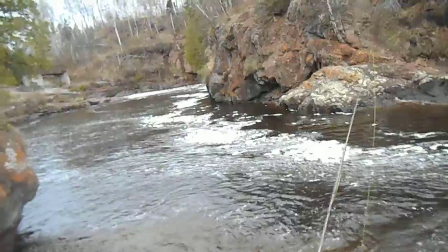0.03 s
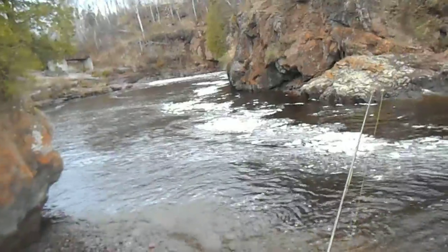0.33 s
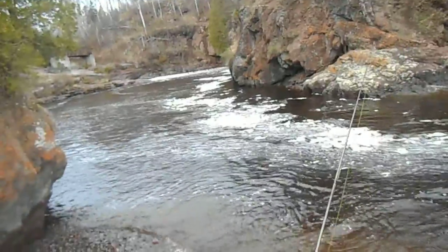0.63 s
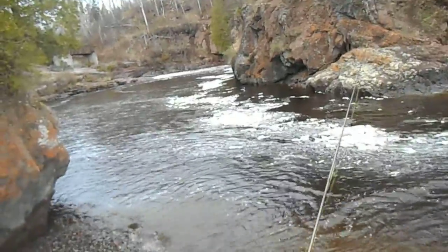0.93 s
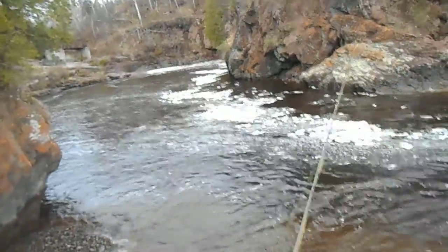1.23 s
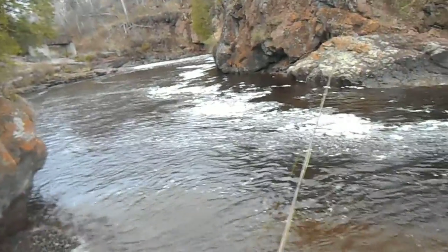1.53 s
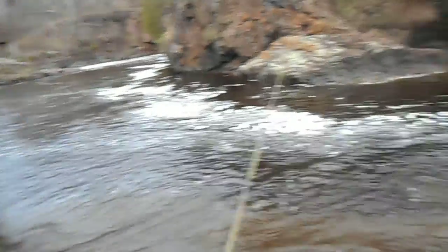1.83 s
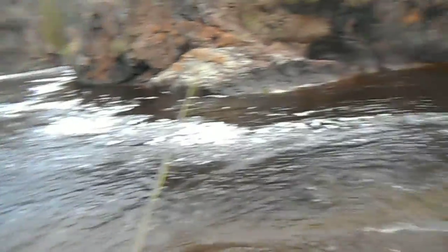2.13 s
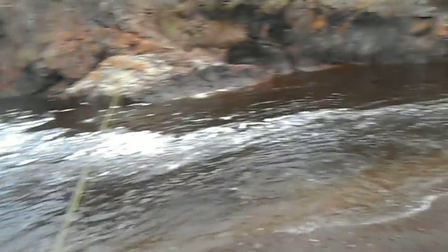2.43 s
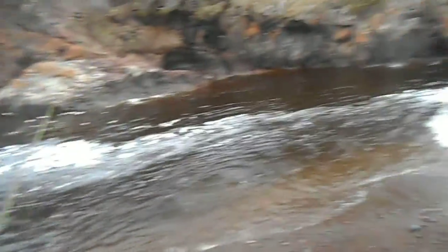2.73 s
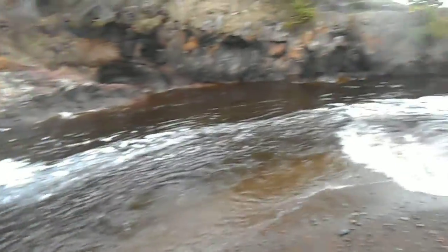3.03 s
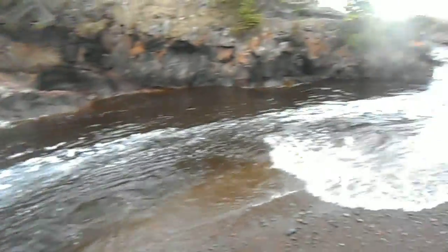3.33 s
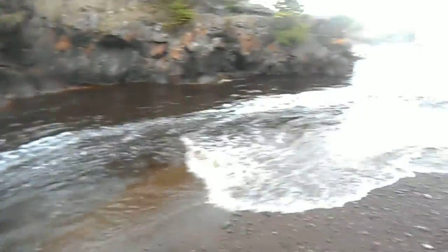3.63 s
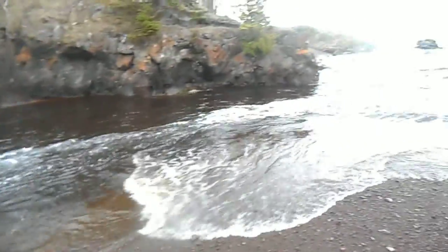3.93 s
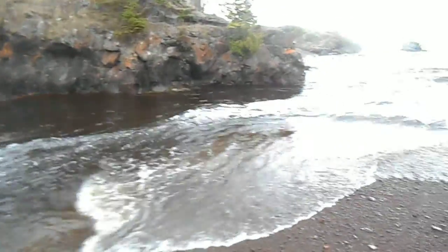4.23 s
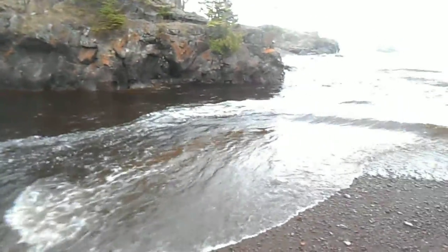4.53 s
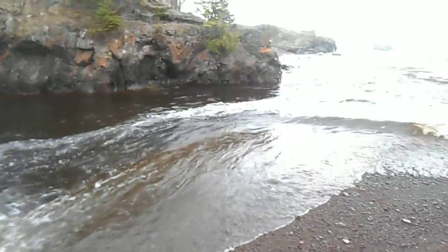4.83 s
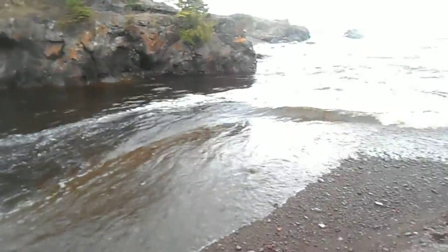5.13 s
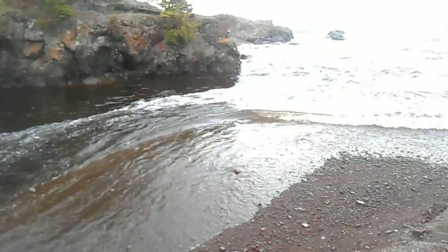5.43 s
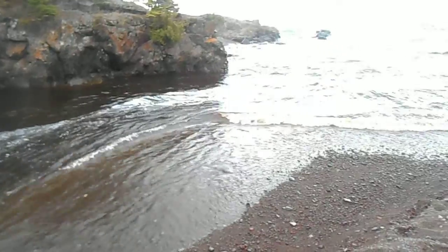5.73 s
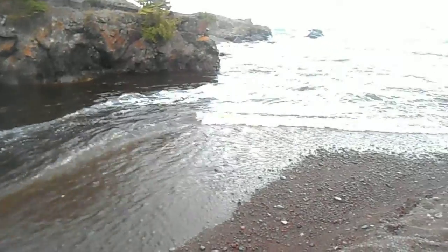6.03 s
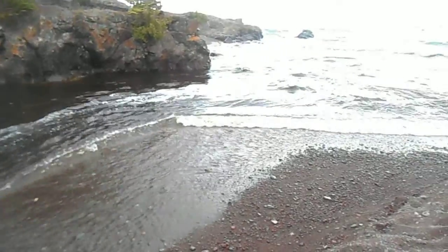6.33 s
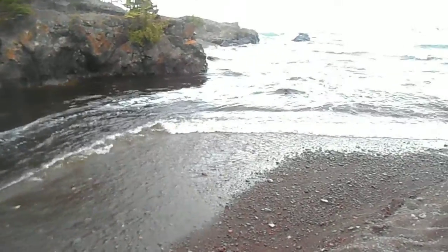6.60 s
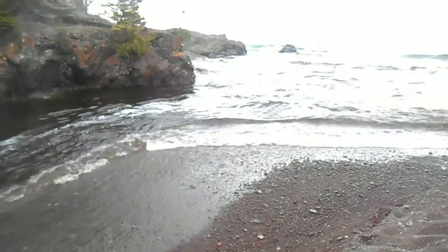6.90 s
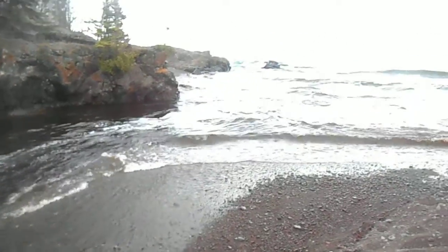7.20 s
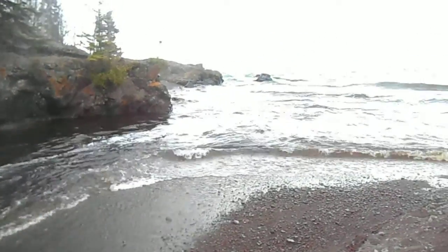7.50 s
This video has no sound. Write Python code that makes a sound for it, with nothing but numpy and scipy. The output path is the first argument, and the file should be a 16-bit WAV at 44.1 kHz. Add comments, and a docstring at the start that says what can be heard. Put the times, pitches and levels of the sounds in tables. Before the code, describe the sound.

Continuous rush of river water meeting a lake, with small waves swelling and fizzing over pebbles and a few faint drips.

```python
"""A short burst of water noise with a low thump of wind comes first; then a river fades in, running
over a pebble beach into a lake where small waves break. Clouds of bubbles make the sound, and the
smaller the bubble, the higher it rings: the current gurgles, rapids and breakers churn, the swash
hisses, its foam fizzes. Near drops plop and patter, and light gusts buffet the microphone."""
import sys
import numpy as np
from scipy import signal
from scipy.fft import rfft, irfft, next_fast_len
from scipy.io import wavfile
from scipy.ndimage import uniform_filter1d

SR = 44100
rng = np.random.default_rng(int(sys.argv[2]) if len(sys.argv) > 2 else 0)


def waveform_to_disk(signal):
    """Save audio, clipped to [-1, 1], as 16-bit WAV at the path in sys.argv[1]."""
    frames = np.transpose(np.atleast_2d(signal))
    scaled = np.clip(frames, -1, 1) * 32767
    samples = np.round(scaled).astype(np.int16)
    wavfile.write(sys.argv[1], SR, samples)


N = 337806
TIME = np.arange(N) / SR

# spectra of the four bubble clouds and of a droplet's splat: frequency_hz, relative_density_db
CURRENT_SPECTRUM = [(30, -6.5), (90, -7), (170, -3), (250, -1), (340, -0.3), (480, -2), (600, -2.5),
                    (750, -5.5), (1300, -26), (3000, -38)]
FOAM_SPECTRUM = [(1500, -21), (3000, -8.5), (5200, 0.5), (6500, 0), (8000, -3.5), (10200, -8), (11000, -24),
                 (11700, -25.5), (12400, -40)]
CHURN_SPECTRUM = [(250, -25), (500, -9), (720, -1.5), (900, -0.5), (1100, 0), (1450, -0.6), (1750, 0),
                  (2100, -1), (2700, -3.5), (3800, -10.5), (5500, -18), (10000, -35)]
SWASH_SPECTRUM = [(800, -17), (1700, -6), (2600, -1), (3500, 0.5), (5000, -3), (6500, -10), (10000, -22.5),
                  (11000, -42)]
SPLAT_SPECTRUM = [(2000, -12), (4000, 0), (7000, 3), (10200, -6.5), (11000, -20), (12400, -32)]
# the current apart from its surges: time_s, level_db
CURRENT_LEVELS = [(.5, -40), (1.0, -39.5), (1.8, -34), (2.4, -35.5), (5.8, -36.5), (6.8, -39.5)]
# wind eddies at the microphone: centre_s, half_length_s, relative_level_db, upper_edge_hz
EDDIES = [(0.045, 0.047, -28.5, 200), (1.418, 0.048, -39, 90), (2.67, 0.11, -37.5, 110),
          (6.962, .05, -39, 59.6), (7.22, 0.053, -34.5, 120), (7.28, .016, -26, 360),
          (7.294, .022, -23, 170), (7.364, .06, -38, 120), (7.45, 0.033, -30, 100), (7.61, 0.14, -37, 120)]
# small splashes at the near bank: centre_s, half_length_s, peak_db
BANK_SPLASHES = [(.675, 0.028, -33), (0.849, .004, -28), (1.263, 0.0036, -30), (1.41, .012, -33),
                 (1.441, .005, -28), (1.78, 0.034, -34), (2.703, .17, -38), (2.741, 0.0033, -22.5),
                 (2.772, 0.032, -30), (2.846, .008, -31)]
# near drops: start_s, pitch_hz, strength_db, t60_s
NEAR_DROPS = [(.2875, 1500, -22, .008), (.4096, 2000, -9, .012), (.430, 6300, -20, .008),
              (.668, 7800, -25, .015), (1.262, 7200, -20, .005), (1.606, 1100, -19, .014),
              (2.741, 6000, -16, .006), (2.767, 6500, -20, .012), (4.300, 2400, -10, .006)]
# steady rush, one row each for churn, swash and foam: facing_rapids_db, facing_lake_db
STEADY_LEVELS = [(-31.5, -30), (-34.5, -28.5), (-40, -32)]
# surges in the rapids: start_s, level_db
RAPIDS_SURGES = [(.39, -29.5), (1.0, -28.5), (1.5, -35)]
# gain of each cloud in a surge: churn_db, swash_db, foam_db
SURGE_GAINS = [0.5, -4.5, -7]
# waves reaching the beach: start_s, hold_s, churn_db, swash_db, foam_db
BEACH_WAVES = [(3.09, .05, -28.5, -24.8, -33.5), (4.21, 0.44, -27.5, -26, -27.5),
               (5.25, .25, -35.5, -29, -32.5), (7.3, .3, -26.5, -22.5, -24)]
# envelope of a wave, one row each for churn, swash and foam: rise_s, fall_db_per_s
WAVE_ENVELOPES = [(0.68, 4), (0.45, 3.5), (0.58, 4.5)]


def undb(db):
    """Amplitude grows tenfold for every 20 decibels."""
    return 10 ** (np.asarray(db) / 20)


def unit(x):
    """Normalisation brings the rms to 1."""
    return x / np.sqrt(np.mean(x ** 2))


def add(out, start_s, sound):
    """Superposition: a short sound adds its pressure to what is already there."""
    start = int(np.clip(start_s * SR, 0, N - 1))
    out[start:start + len(sound)] += sound[:N - start]


def ramp(start_s, length_s):
    """A linear rise from 0 saturates at 1."""
    return np.clip((TIME - start_s) / length_s, 0, 1)


def colour(x, spectrum):
    """Filtering weights each frequency by a spectrum and rolls off beyond its ends; rms 1."""
    hz, db = np.transpose(spectrum)
    size = next_fast_len(N)
    log_f = np.log(np.maximum(np.arange(size // 2 + 1) * SR / size, 1))
    outside = np.abs(log_f - np.clip(log_f, np.log(hz[0]), np.log(hz[-1])))
    gain = undb(np.interp(log_f, np.log(hz), db) - 20 * outside)
    return unit(irfft(rfft(x, size) * gain, size)[:N])


def flicker(rate_hz):
    """Random modulation glides from one chance value to the next; rms 1."""
    hold = max(int(SR / rate_hz), 2)
    held = np.repeat(rng.standard_normal(N // hold + 2), hold)
    return unit(uniform_filter1d(held[rng.integers(hold):][:N], hold))


def wash(flicker_db, flicker_hz, bands=8):
    """Countless far bubbles sum incoherently to noise, each size class flickering in its own band."""
    edges_hz = np.geomspace(100, 13000, bands + 1)
    size = next_fast_len(N)
    noise = rfft(rng.standard_normal(size))
    band = np.searchsorted(edges_hz[1:-1], np.arange(len(noise)) * SR / size)
    classes = (irfft(noise * (band == k), size)[:N] for k in range(bands))
    return unit(sum(rush * undb(flicker_db * flicker(flicker_hz)) for rush in classes))


def bubble(hz, t60_s, pitch_rise):
    """A bubble is a damped oscillator whose resonance rises as it nears the surface."""
    t = np.arange(int(t60_s * SR) + 2) / SR
    phase = 2 * np.pi * hz * t * (1 + pitch_rise * t / t60_s / 2)
    decay = np.exp(-np.log(1000) * t / t60_s)
    onset = 1 - np.exp(-t * hz)
    return np.sin(phase) * decay * onset


def bubbles(low_hz, high_hz, per_s, t60_cycles, scatter_db, classes=20):
    """Bubbles of many sizes resonate at random moments, most faint and a few stronger."""
    out = np.zeros(N)
    for hz in np.geomspace(low_hz, high_hz, classes):
        moment, chance = rng.random((int(per_s * N / SR / classes) + 1, 2)).T
        strength = undb(-scatter_db * np.log(np.maximum(chance, np.exp(-5))))
        polarity = (-1) ** np.arange(len(strength))
        births = np.bincount((moment * N).astype(int), strength * polarity, N)
        ring = bubble(hz, t60_cycles / hz, pitch_rise=0.27)
        out += np.sqrt(hz) * unit(signal.oaconvolve(births, ring)[:N])
    return unit(out)


def wind():
    """Turbulent pressure at the microphone makes each eddy a short, low thump."""
    out = np.zeros(N)
    for centre_s, half_s, db, edge_hz in EDDIES:
        puff = np.hanning(int(2 * half_s * SR))
        band = signal.butter(3, [edge_hz / 4, edge_hz], "band", fs=SR, output="sos")
        eddy = signal.sosfilt(band, rng.standard_normal(SR))
        add(out, centre_s - half_s, undb(db - 6.0) * unit(puff * eddy[-len(puff):]))
    return out


def spray(per_s, scatter_db, t60_s, faintest_db):
    """Droplet impacts at the near bank radiate brief, bright noise; now and then a whole splash comes."""
    moment, chance = rng.random((int(per_s * N / SR), 2)).T
    strength = undb(faintest_db - scatter_db * np.log(np.maximum(chance, np.exp(-4))))
    impacts = np.bincount((moment * N).astype(int), strength, N)
    decay = np.exp(-np.log(1000) / (t60_s * SR))
    envelope = signal.lfilter([1], [1, -decay], impacts + 1e-18)
    for centre_s, half_s, db in BANK_SPLASHES:
        add(envelope, centre_s - half_s, undb(db) * np.hanning(int(2 * half_s * SR)))
    return envelope * colour(rng.standard_normal(N), SPLAT_SPECTRUM)


def drops():
    """Each near drop plops with the free oscillation of a single bubble."""
    out = np.zeros(N)
    for start_s, hz, db, t60_s in NEAR_DROPS:
        add(out, start_s, undb(db) * bubble(hz, t60_s, pitch_rise=0.075))
    return out


def current():
    """The river folds under large air pockets, whose low resonances gurgle."""
    gurgle = bubbles(low_hz=224, high_hz=1290, per_s=500, t60_cycles=11.7, scatter_db=0.5)
    return colour(wash(flicker_db=-0.1, flicker_hz=23) + undb(-20) * gurgle, CURRENT_SPECTRUM)


def foam():
    """Tiny bubbles burst in the froth behind the waves; the smallest resonators ring highest."""
    fizz = bubbles(low_hz=3850, high_hz=10400, per_s=6000, t60_cycles=12.2, scatter_db=2.5)
    return colour(wash(flicker_db=0.57, flicker_hz=25) + undb(-5.5) * fizz, FOAM_SPECTRUM)


def churn():
    """Rapids and breakers entrain middle-sized bubbles, which resonate in the midrange."""
    babble = bubbles(low_hz=747.5, high_hz=3500, per_s=2500, t60_cycles=26, scatter_db=2.0)
    splashing = undb(0.11 * flicker(rate_hz=25))
    return colour(wash(flicker_db=0.5, flicker_hz=20) + undb(-13.5) * babble, CHURN_SPECTRUM) * splashing


def swash():
    """White water runs up the pebbles, and the resonances of its small bubbles merge into a hiss."""
    seething = bubbles(low_hz=1783, high_hz=6040, per_s=7000, t60_cycles=14.4, scatter_db=2.5)
    return colour(wash(flicker_db=0.42, flicker_hz=18) + undb(-10) * seething, SWASH_SPECTRUM)


def swell(start_s, hold_s, rise_s, fall_db_per_s):
    """Amplitude grows as water piles up, holds while it breaks and decays exponentially as it settles."""
    settling_s = np.maximum(TIME - start_s - rise_s - hold_s, 0)
    return ramp(start_s, rise_s) * undb(-fall_db_per_s * settling_s)


def surge_power():
    """Surges in the rapids are incoherent, so their powers add."""
    return sum((undb(db) * swell(start_s, hold_s=0, rise_s=0.37, fall_db_per_s=8.5)) ** 2
               for start_s, db in RAPIDS_SURGES)


def white_water_gain(cloud):
    """Steady rush, surges and waves add in power within a cloud (0 churn, 1 swash, 2 foam)."""
    rapids_db, lake_db = STEADY_LEVELS[cloud]
    turn = ramp(start_s=1.65, length_s=1.0)  # the listener turns from the rapids towards the lake
    steady = undb(rapids_db + (lake_db - rapids_db) * turn) ** 2
    surges = undb(SURGE_GAINS[cloud]) ** 2 * surge_power()
    waves = sum((undb(levels_db[cloud]) * swell(start_s, hold_s, *WAVE_ENVELOPES[cloud])) ** 2
                for start_s, hold_s, *levels_db in BEACH_WAVES)
    return np.sqrt(steady + surges + waves)


def scene():
    """River, surf, spray, drops and wind superpose in one channel."""
    flow = undb(np.interp(TIME, *np.transpose(CURRENT_LEVELS)))
    river = np.sqrt(flow ** 2 + undb(-10.5) ** 2 * surge_power()) * current()  # surges swell the gurgle
    surf = sum(white_water_gain(cloud) * source() for cloud, source in enumerate([churn, swash, foam]))
    patter = spray(per_s=46, scatter_db=3.5, t60_s=.016, faintest_db=-44)
    return (river + surf + patter + drops() + wind())[None]


def record(dry):
    """A gate passes a short burst, the gain then fades in, and a low-pass filter cuts above 12 kHz."""
    burst = undb(-7.5) * ((TIME > .037) & (TIME < .085))
    gain = np.maximum(burst, ramp(start_s=.06, length_s=0.29))
    low_pass = signal.ellip(8, .2, 70, 12000, fs=SR, output="sos")
    return signal.sosfilt(low_pass, dry * gain)


dry = scene()
out = record(dry)
waveform_to_disk(out)
```